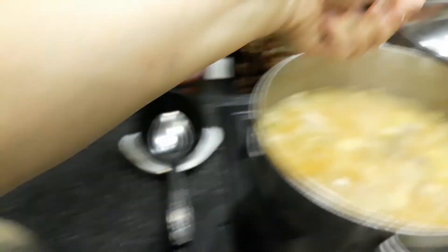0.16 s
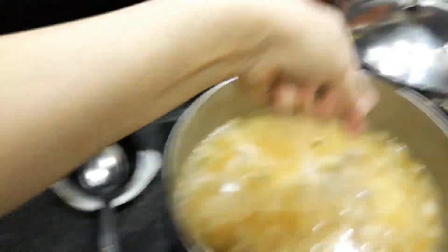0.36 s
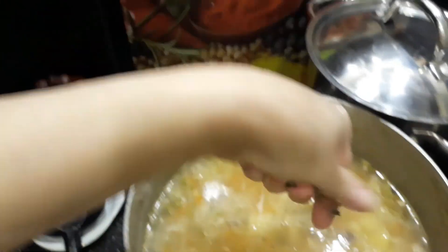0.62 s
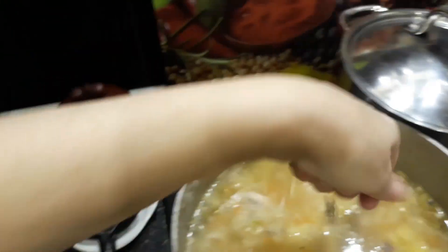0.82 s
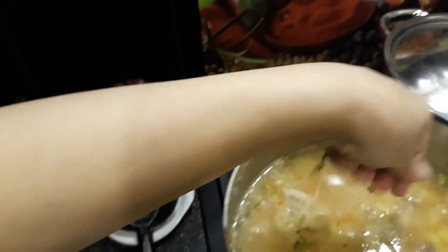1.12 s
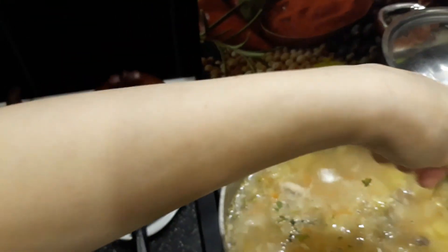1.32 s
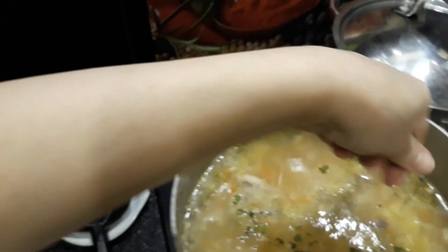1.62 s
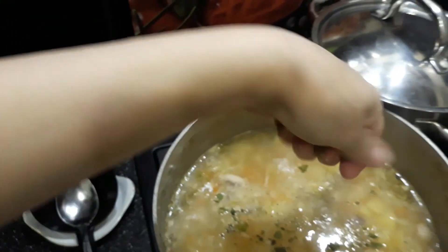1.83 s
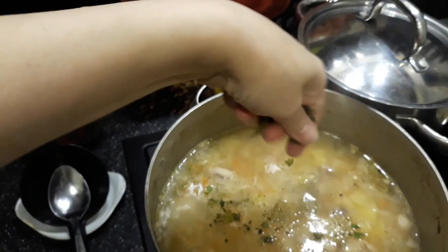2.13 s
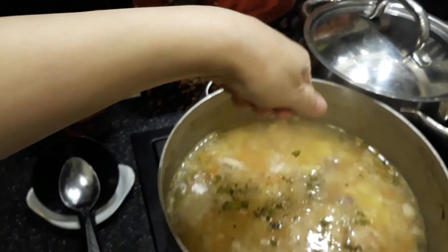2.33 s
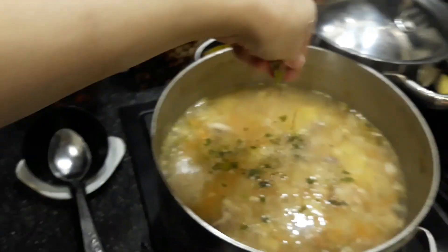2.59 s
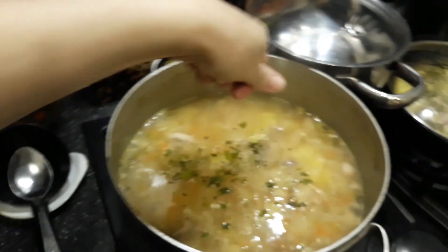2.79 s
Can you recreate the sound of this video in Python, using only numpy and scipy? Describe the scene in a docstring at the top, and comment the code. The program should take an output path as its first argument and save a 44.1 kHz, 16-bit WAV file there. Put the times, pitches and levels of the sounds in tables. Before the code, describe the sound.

Fingers crumble dried herbs over a soup pot, a close, dry, crackling rustle that starts at about 0.2 seconds and swells roughly twice a second. Small stalks snap throughout, sharpest near 1.1, 1.9 and 2.7 seconds. Two very soft, dull bumps lie underneath at about 0.3 and 1.3 seconds. The rubbing eases near 2.8 seconds, over a faint, steady kitchen hum.

```python
"""A quiet kitchen hums faintly; at once, close by, fingers crumble dried parsley over a pot of soup.
The thumb rubs to and fro about twice a second: countless flakes crack and slide, a few stalks snap.
The rustle rings in the hollow of the hand, whose pitch rises as the fingers close.
Pot and soup reflect and colour it. Two soft, dull bumps sound underneath."""
import sys
import numpy as np
from scipy import signal
from scipy.fft import rfft, irfft, next_fast_len
from scipy.io import wavfile

SR = 44100
rng = np.random.default_rng(int(sys.argv[2]) if len(sys.argv) > 2 else 0)


def dump_mix(stems):
    """Bounce the given channels to the path in sys.argv[1] as a 16-bit WAV at rate SR."""
    frames = np.atleast_2d(stems).T  # one column per channel
    limited = np.clip(frames, -1, 1)  # hard clip at full scale
    pcm = np.round(limited * 32767).astype(np.int16)
    wavfile.write(sys.argv[1], SR, pcm)


N = 130095
T = np.arange(N) / SR
USUAL_EFFORT_DB, USUAL_HOLLOW_DB = -44, -55
USUAL_HOLLOW_HZ, HOLLOW_WIDTH_HZ = 2240, 414


def from_db(db):
    """Decibels to gain."""
    return 10 ** (np.asarray(db) / 20)


def unit_rms(x):
    """Scale to rms 1."""
    return x / np.sqrt(np.mean(x ** 2) + 1e-20)


def per_sample(rows):
    """Each column of a time curve at every sample."""
    times_s, *columns = np.transpose(rows)
    return [np.interp(T, times_s, column) for column in columns]


def drift(hz):
    """Slow random wander, rms 1."""
    r = np.exp(-2 * np.pi * hz / SR)
    return unit_rms(signal.lfilter([1], [1, -2 * r, r * r], rng.standard_normal(N + SR))[SR:])


def coloured(x, spectrum):
    """Minimum-phase filter with the given spectrum; output rms 1."""
    hz, db = np.transpose(spectrum)
    size = 2 * next_fast_len(N)
    grid_hz = np.maximum(np.arange(size // 2 + 1) * SR / size, 1)
    gain = from_db(np.interp(np.log(grid_hz), np.log(hz), db))
    cepstrum = irfft(np.log(gain))
    response = np.exp(rfft(2 * cepstrum[:size // 2], size))
    return unit_rms(irfft(rfft(x, size) * response)[:N])


def resonance(hz, width_hz):
    """Band-pass coefficients, peak gain 1."""
    r = np.exp(-np.pi * width_hz / SR)
    return (1 - r * r) / 2 * np.array([1, 0, -1]), [1, -2 * r * np.cos(2 * np.pi * hz / SR), r * r]


def gliding(x, hz, width_hz, block=128):
    """Resonance that follows a pitch curve."""
    out, state = np.zeros(N), np.zeros(2)
    widths_hz = np.broadcast_to(width_hz, N)
    for i in range(0, N, block):
        b, a = resonance(hz[i], widths_hz[i])
        out[i:i + block], state = signal.lfilter(b, a, x[i:i + block], zi=state)
    return out


# Room noise spectrum: (frequency [Hz], relative level [dB])
ROOM_SPECTRUM = [(20, -10.5), (42, -19.5), (68, -0.5), (85, -5), (110, -2.5), (145, -5.5), (190, -13),
                 (330, -19.5), (900, -21), (1800, -28.5), (3000, -30.5), (16000, -23.5)]
# Steady hum bands: (centre [Hz], width [Hz], level [dB])
HUM_BANDS = [(141.3, 8.1, -78.5), (1387, 50, -74.5)]


def kitchen(room_db=-65):
    """Low room rumble with a faint hum and a thin steady hiss."""
    out = from_db(room_db) * coloured(rng.standard_normal(N), ROOM_SPECTRUM)
    for hz, width_hz, db in HUM_BANDS:
        band = signal.lfilter(*resonance(hz, width_hz), rng.standard_normal(N + SR))[SR:]
        out += from_db(db) * unit_rms(band)
    return out


def fractures(push_db, usual_per_s=9000, spread_db=3.5, flurries_per_s=130, flurry_s=0.0021):
    """Flakes crack in tiny clicks, denser under more push; a leaf giving way makes a short flurry."""
    chance = np.clip(usual_per_s * from_db(0.73 * push_db) / SR, 1e-4, 1)
    sizes = from_db(spread_db * np.minimum(rng.exponential(1, N), 3.8))
    signs = rng.choice([-1, 1], N)
    onsets = (rng.random(N) < flurries_per_s / SR) * np.minimum(rng.exponential(1, N), 2)
    flurries = signal.lfilter([1], [1, -np.exp(-1 / (flurry_s * SR))], onsets + 1e-18)
    clicks = (rng.random(N) < chance) * sizes * signs / np.sqrt(chance)  # same power at any density
    return unit_rms(clicks * (1 + 0.9 * flurries))


def friction(push_db, grit=0.98):
    """Skin slides on leaf: smooth hiss with some grit."""
    return rng.standard_normal(N) + grit * fractures(push_db)


def hand_hollow(drive, hz, overtone_db=-5, flutter_db=1.5, flutter_hz=25):
    """The hollow rings with a weaker, steadier overtone; both flutter as finger gaps open and shut."""
    damping = hz / USUAL_HOLLOW_HZ  # closing fingers widen the resonance
    main = gliding(drive, hz, HOLLOW_WIDTH_HZ * damping)
    main = unit_rms(gliding(main, hz, width_hz=1100) / np.sqrt(damping))
    main *= from_db(flutter_db * drift(flutter_hz))
    overtone_hz = 4290 * (hz / USUAL_HOLLOW_HZ) ** 0.18
    overtone = gliding(drive, overtone_hz, width_hz=420)
    overtone = unit_rms(gliding(overtone, overtone_hz, width_hz=2600))
    overtone *= from_db(overtone_db + flutter_db * drift(flutter_hz))
    return main + overtone


# Rubbing effort: (time [s], relative level [dB])
RUB_EFFORT = [(0.0,-89), (0.09,-63.5), (0.178,-56.5), (0.187,-50.5), (0.335,-47), (0.39,-52.5), (0.435,-49),
              (0.463,-39), (0.535,-46), (0.558,-40), (0.575,-52.5), (0.61,-53), (0.64,-49), (0.69,-43.5),
              (0.80,-46), (0.95,-53), (1.0,-37), (1.025,-44.5), (1.1,-38), (1.14,-42), (1.22,-40),
              (1.31,-47.5), (1.34,-53.5), (1.39,-53), (1.5,-40.5), (1.55,-45.5), (1.585,-39), (1.63,-38),
              (1.735,-44.5), (1.76,-38), (1.78,-45.5), (1.89,-52), (1.94,-47.5), (1.995,-42.5), (2.05,-49),
              (2.095,-39), (2.16,-46), (2.205,-37), (2.24,-43.5), (2.30,-48), (2.43,-56), (2.465,-55.5),
              (2.485,-44), (2.515,-43.5), (2.59,-51.5), (2.685,-35), (2.705,-39.5), (2.785,-43.5),
              (2.82,-52.5), (2.88,-55), (2.95,-54.5)]
# Hand resonance: (time [s], pitch [Hz], relative level [dB])
HAND_RESONANCE = [(0.0,1840,-101), (0.32,1630,-63), (0.40,1640,-65.5), (0.455,2020,-54), (0.52,2230,-63.5),
                  (0.57,2520,-52.5), (0.60,2630,-65), (0.635,2480,-59), (0.68,1920,-59.5), (0.80,1860,-57),
                  (0.87,1970,-59), (0.93,2020,-57), (0.985,2460,-51), (1.04,3080,-54.5), (1.085,2730,-53),
                  (1.21,2650,-55.5), (1.255,2080,-54), (1.30,1910,-52.5), (1.375,1930,-62), (1.42,1980,-51),
                  (1.455,2050,-52.5), (1.49,2550,-47), (1.54,2970,-56.5), (1.62,2860,-48),
                  (1.68,2740,-55.5), (1.712,2700,-51), (1.74,2350,-54), (1.775,2060,-57),
                  (1.935,1990,-57.5), (1.965,2550,-54), (2.0,2800,-48.5), (2.05,2800,-56.5),
                  (2.11,2880,-50.5), (2.205,2860,-55.5), (2.24,2400,-55), (2.29,2200,-58.5),
                  (2.45,2300,-63), (2.51,2580,-51.5), (2.59,2730,-60), (2.66,2660,-54), (2.725,2500,-56.5),
                  (2.79,2170,-55.5), (2.86,2160,-63.5), (2.95,2100,-61)]
# Cracking flakes: (frequency [Hz], relative level [dB])
CRACK_SPECTRUM = [(500, -30.5), (1100, -28.5), (2200, -36.5), (3200, -38.5), (4600, -13.5), (6000, -8),
                  (7400, -6), (8700, -4), (10300, -7), (13000, -4.5), (15600, -2)]
# Sliding flakes: (frequency [Hz], relative level [dB])
SLIDE_SPECTRUM = [(500, -24), (1000, -23), (1500, -16.5), (2400, -9), (3000, -9), (3800, 2.5), (4500, 2.5),
                  (5400, -2.5), (7400, -2.5), (8600, 2), (10300, -3.5), (13000, 3.5), (15600, 0.5)]


def rustle(crack_gain_db=2, slide_gain_db=-1.5, ring_gain_db=-1.5, snap_ring_db=7, dip_depth=0.25):
    """Flakes crack and slide under the thumb, stalks snap, and the hollow of the hand rings."""
    effort_db, = per_sample(RUB_EFFORT)
    hollow_hz, hollow_db = per_sample(HAND_RESONANCE)
    push_db = effort_db - USUAL_EFFORT_DB
    slide_db = USUAL_EFFORT_DB + 0.41 * push_db + 0.78 * (hollow_db - USUAL_HOLLOW_DB)
    cracking = from_db(effort_db + crack_gain_db) * coloured(fractures(push_db), CRACK_SPECTRUM)
    sliding = from_db(slide_db + slide_gain_db) * coloured(friction(push_db), SLIDE_SPECTRUM)
    ringing = from_db(hollow_db + ring_gain_db) * hand_hollow(friction(push_db), hollow_hz)
    snaps = stalk_snaps()
    snap_ringing = from_db(snap_ring_db) * gliding(snaps, hollow_hz, HOLLOW_WIDTH_HZ)
    out = cracking + sliding + ringing + snaps + snap_ringing
    dip_hz = 3107 * (hollow_hz / USUAL_HOLLOW_HZ) ** 0.47  # the hollow weakens a band above its pitch
    return out - dip_depth * gliding(out, dip_hz, width_hz=190)


# Reflections: (delay [s], gain [dB])
POT_ECHOES = [(.0007, -12.5), (.0017, -14), (.0031, -12.5), (.0052, -16), (.0083, -17.5)]


def echoes(x, sway_s=0.00006, sway_hz=3.04):
    """Soup, pot wall and lid reflect the sound; the paths sway as the hand moves."""
    out = x.copy()
    for delay_s, db in POT_ECHOES:
        out += from_db(db) * np.interp(T - delay_s + sway_s * drift(sway_hz), T, x)
    return out


# Peaks and dips of the open pot: (centre [Hz], width [Hz], gain [dB])
POT_BANDS = [(1390,118,8.5), (1510,330,-2.5), (2048,225,7), (2280,82,-11.5), (2460,180,4.5), (3220,250,0),
             (8700,1200,2.5)]


def pot(x):
    """The pot and the soup surface lift some pitches and weaken others."""
    for hz, width_hz, db in POT_BANDS:
        root_gain = np.sqrt(from_db(db))
        half_width = np.pi * width_hz / SR
        tuning = -2 * np.cos(2 * np.pi * hz / SR)
        b = [1 + half_width * root_gain, tuning, 1 - half_width * root_gain]
        a = [1 + half_width / root_gain, tuning, 1 - half_width / root_gain]
        x = signal.lfilter(b, a, x)
    return x


# Breaking stalks: (time [s], relative level [dB], pitch [Hz], splinter decay [s])
STALK_SNAPS = [(.1398,-37,14200,0.00036), (0.1856,-40.5,7200,.004), (.214,-42,6400,.002),
               (.2761,-33,13000,.0004), (0.464,-32,12000,.004), (.8708,-35,8900,.0005),
               (1.0362,-25.5,9600,0.00091), (1.0872,-26,9300,.0005), (1.124,-16.5,15200,.001),
               (1.163,-29,13000,.0015), (1.1808,-28.5,4540,.0015), (1.2409,-29,5200,.0012),
               (1.426,-34,14100,.0007), (1.4712,-32,13000,.0005), (1.6293,-30,4600,0.0032),
               (1.7055,-29,13100,.0005), (1.7545,-28,7500,0.0036), (1.834,-33,4060,0.00039),
               (1.9457,-8.5,15900,0.00066), (2.722,-18.5,8400,0.00046), (2.728,-25.5,7300,0.0007)]


def stalk_snaps(gain_db=5.5, splinter_db=-23.5, broad_crack=0.11, low_cut_hz=1700, size=1024):
    """A stalk breaks: one sharp click, a brief ring and a dying spray of splinters."""
    out = np.zeros(N + size)
    for time_s, db, hz, decay_s in STALK_SNAPS:
        burst = from_db(splinter_db) * rng.standard_normal(size) * np.exp(-T[:size] / decay_s)
        burst[0] = 1  # the click
        b, a = resonance(hz, width_hz=1650)
        ring = signal.lfilter(b / b[0], a, burst) / 2
        start = int(time_s * SR)
        out[start:start + size] += from_db(db + gain_db) * (ring + broad_crack * burst)
    return signal.sosfilt(signal.butter(4, low_cut_hz, "high", fs=SR, output="sos"), out[:N])


# Soft bumps: (time [s], pitch [Hz], relative level [dB])
SOFT_BUMPS = [(0.285, 268, -57.5), (1.266, 533, -59.5)]


def bumps(rise_s=0.014):
    """Dull puffs of noise that swell and die quickly."""
    out = np.zeros(N)
    for time_s, hz, db in SOFT_BUMPS:
        age = np.maximum(T - time_s, 0) / rise_s
        b, a = resonance(hz, width_hz=240)
        puff = signal.lfilter(b, a, signal.lfilter(b, a, rng.standard_normal(N)))
        out += from_db(db) * age * np.exp(-age) * unit_rms(puff)
    return out


def scene():
    """Rustle over the pot, bumps and room, alike in both channels."""
    mono = pot(echoes(rustle())) + bumps() + kitchen()
    return np.tile(mono, (2, 1))


def record(dry):
    """Steep cut of the highest treble."""
    low_pass = signal.firwin(301, cutoff=15950, fs=SR)
    return signal.fftconvolve(dry, low_pass[None], "same", axes=1)


dry = scene()
out = record(dry)
dump_mix(out)
```